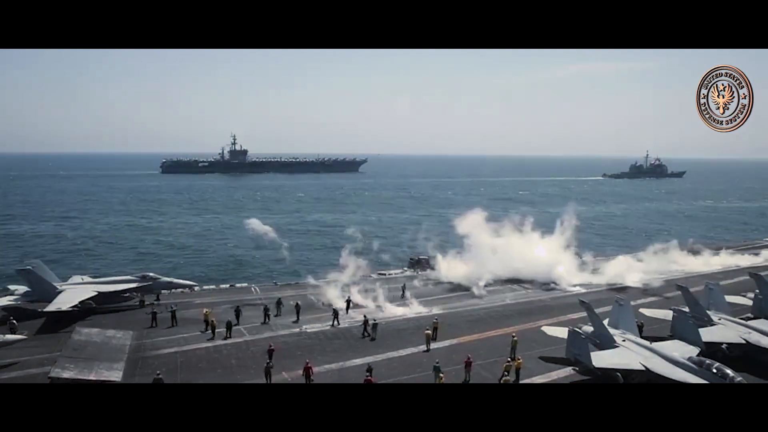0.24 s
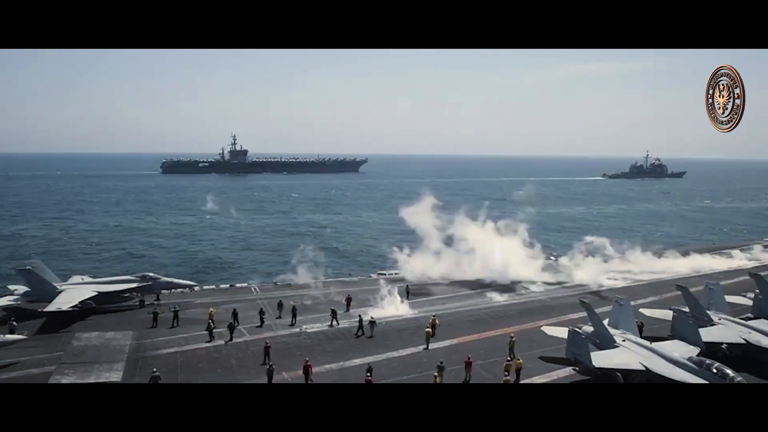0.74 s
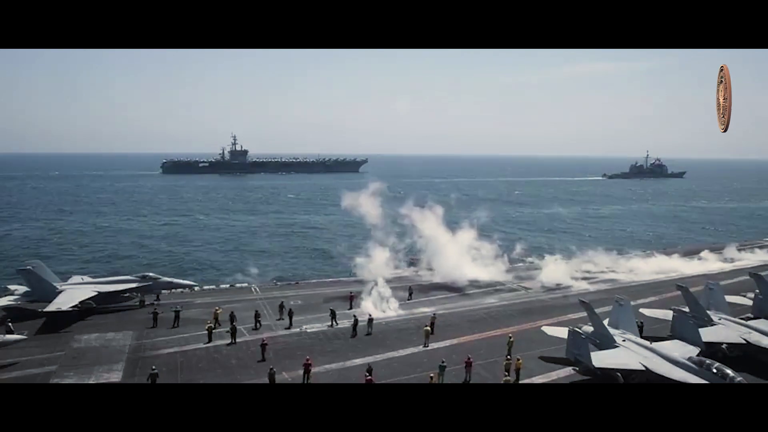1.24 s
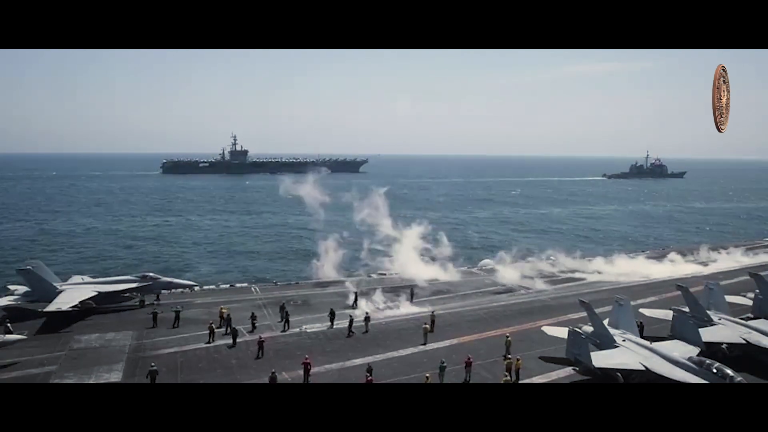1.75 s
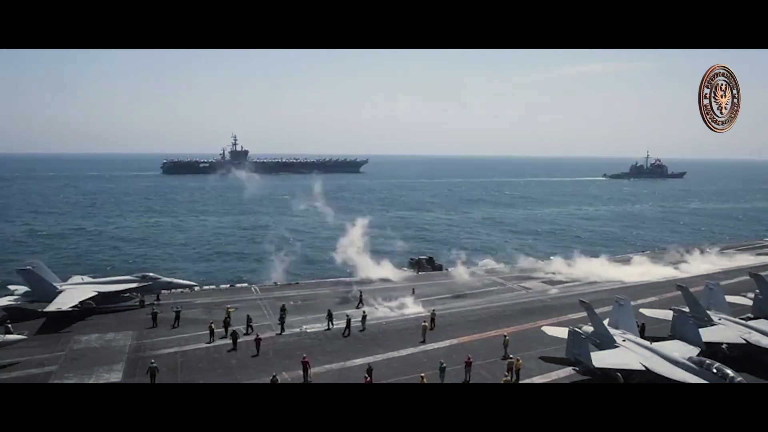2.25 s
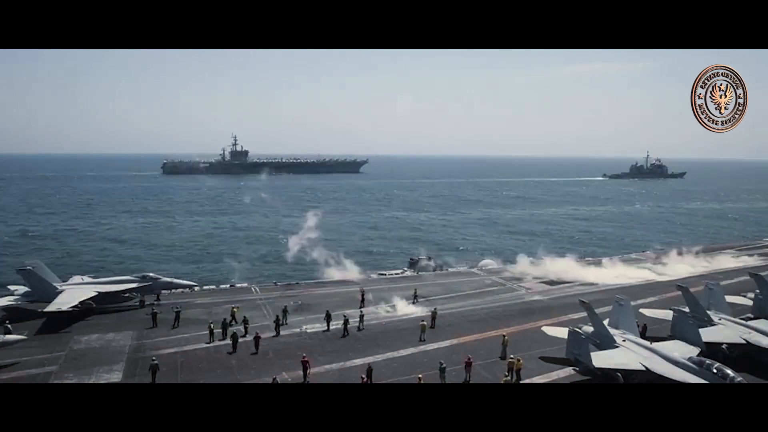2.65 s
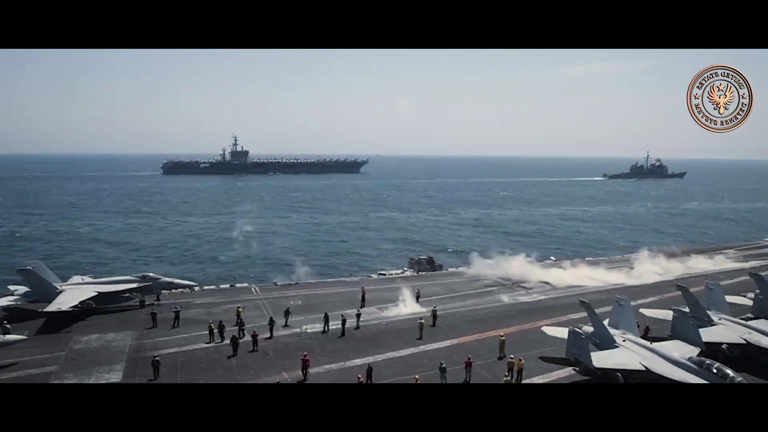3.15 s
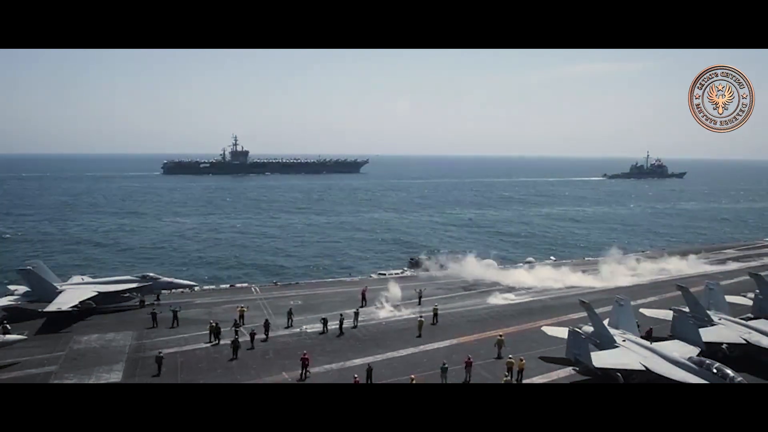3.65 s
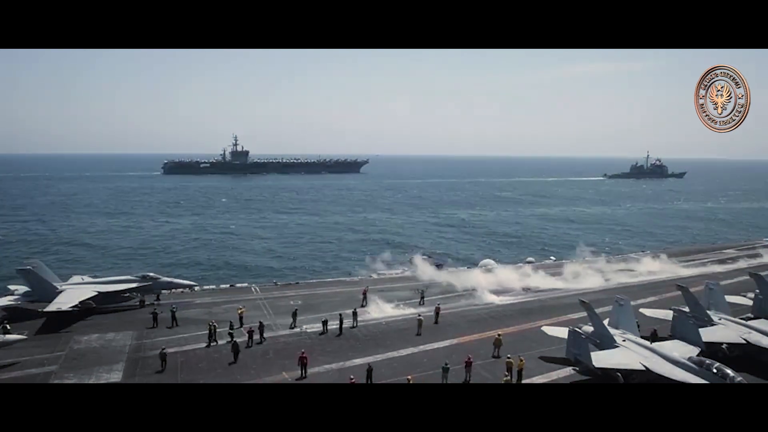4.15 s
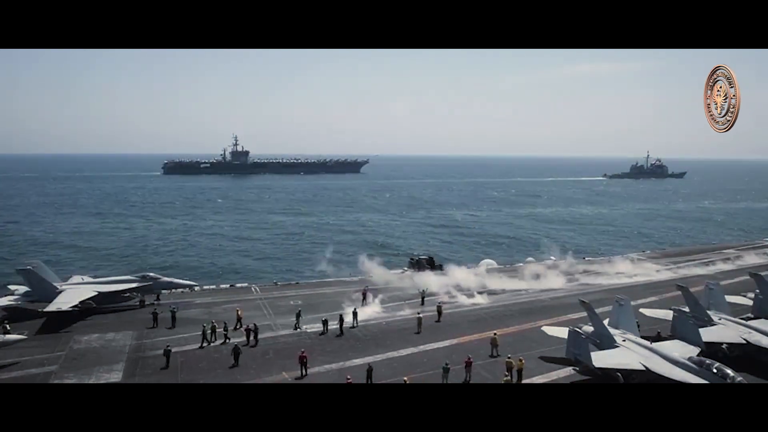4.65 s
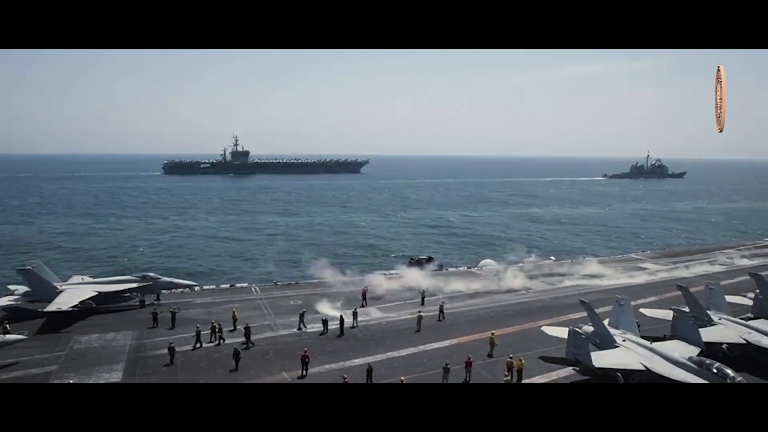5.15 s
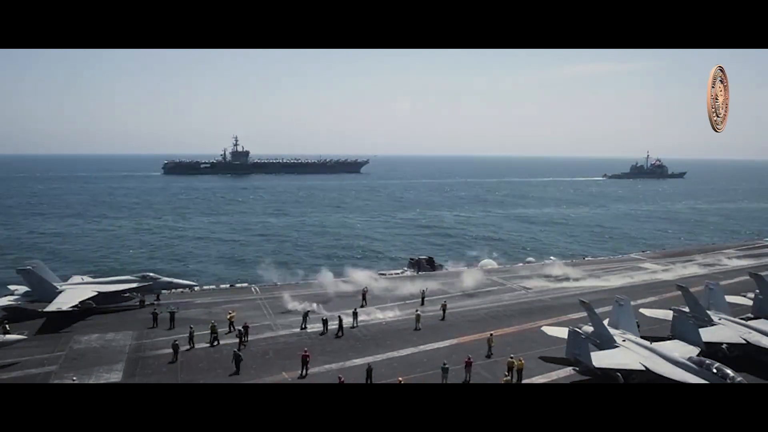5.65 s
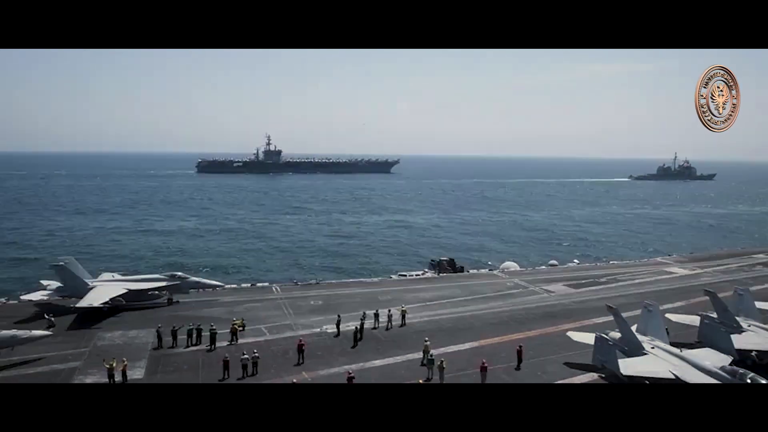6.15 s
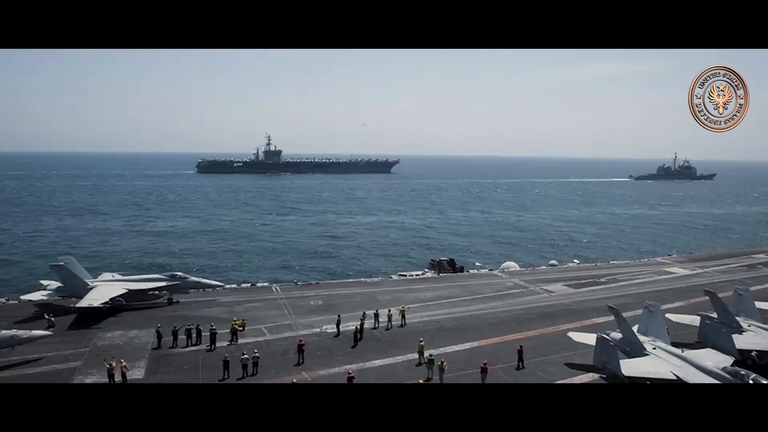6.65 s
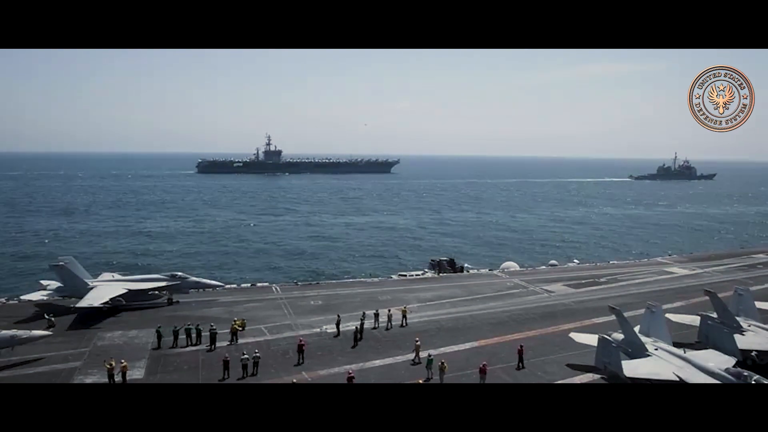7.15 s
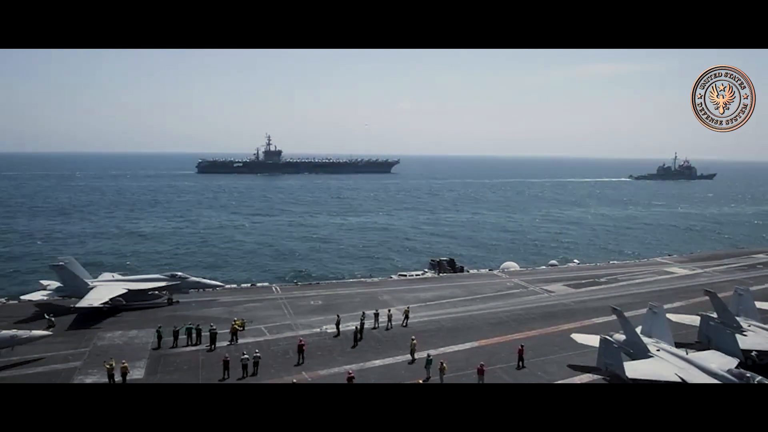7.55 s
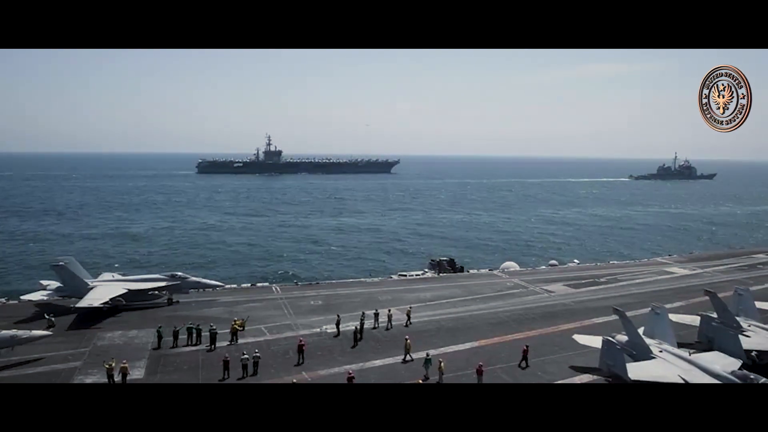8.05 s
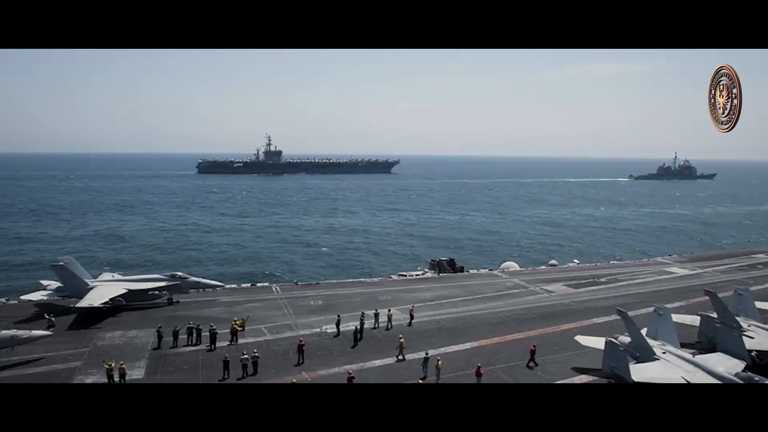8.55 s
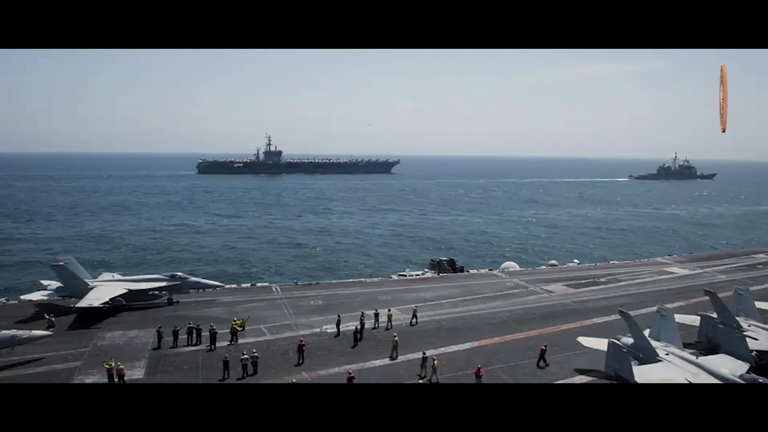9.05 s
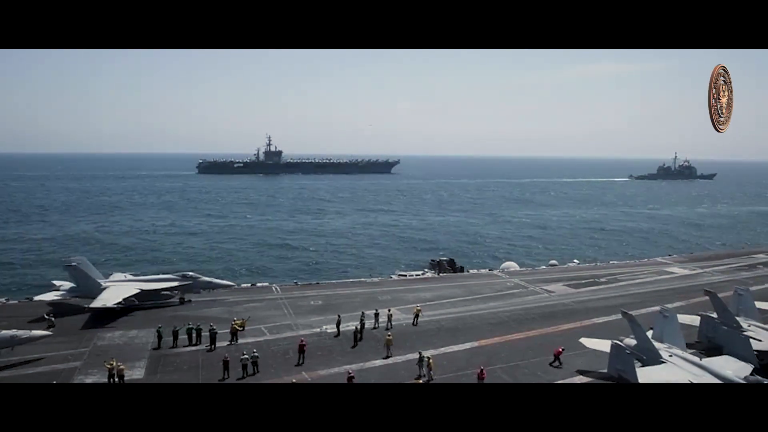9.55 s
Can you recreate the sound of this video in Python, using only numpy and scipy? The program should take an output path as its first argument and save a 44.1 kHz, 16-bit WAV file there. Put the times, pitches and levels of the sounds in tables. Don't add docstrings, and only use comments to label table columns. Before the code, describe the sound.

Windy carrier deck: subdued jet rumble and wavering whine for six seconds, a tiny tick, then a much louder steady jet roar with one brief dropout.

```python
import sys
import numpy as np
from scipy import signal
from scipy.io import wavfile
from scipy.ndimage import uniform_filter1d

SR = 44100
rng = np.random.default_rng(int(sys.argv[2]) if len(sys.argv) > 2 else 0)


def natural_amplitude(level_db):
    exponent = np.asarray(level_db, float) / 20
    return 10 ** exponent


def pcm_store(signal):
    levels = np.round(np.clip(np.atleast_2d(signal), -1, 1) * 32767)
    wavfile.write(sys.argv[1], SR, levels.astype(np.int16).T)


N = 433062
T = np.arange(N) / SR
IDLE_END = 273600
HOP, SIZE = 256, 1024
COARSE = 16


def evened(x):
    return x / np.sqrt(np.mean(abs(x) ** 2) + 1e-20)


def columns(rows, at, warp=lambda v: v):
    first, *rest = np.transpose(rows)
    return [np.interp(warp(at), warp(first), column) for column in rest]


def log_hz(hz):
    return np.log(hz + 1.)


def chance(*shape):
    z = rng.standard_normal(shape + (2,))
    return z[..., 0] + 1j * z[..., 1]


def patchy(frames, bins, size):
    blotches = uniform_filter1d(rng.standard_normal((frames, bins)), size=size[0], axis=0)
    return evened(uniform_filter1d(blotches, size=size[1], axis=1))


def bells(rows, t):
    s, half, db = np.transpose(rows)[..., None]
    return np.exp(-((t - s) / half) ** 2), db


def bumps(rows, t):
    bell, db = bells(rows, t)
    return (db * bell).sum(0)


LAYER_CENTRES = [70, 200, 1000, 3200, 7000]
# f/Hz, half width/Hz, depth/dB, flutter/dB
NARROW_SLOT = (4780, 90, -11, 6)


def turbulence_db(hz, layers, colour, patchy_db, flicker_db, slot):
    frames, count = len(layers[0]), len(LAYER_CENTRES)
    layers = layers - layers.mean(axis=1, keepdims=True)
    centres = log_hz(np.array(LAYER_CENTRES))
    blend = np.array([np.interp(log_hz(hz), centres, row) for row in np.eye(count)])
    field_db = columns(colour, hz, log_hz)[0] + layers.T @ blend
    field_db += patchy_db * patchy(frames, len(hz), size=(8, 6))
    eddies = uniform_filter1d(rng.standard_normal((frames, count)), size=4, axis=0)
    field_db += flicker_db * (evened(eddies) @ blend) * np.minimum(hz / 4000, 1)
    if slot:
        slot_hz, half_hz, depth_db, flutter_db = NARROW_SLOT
        flutter = patchy(frames, count, size=(14, 1))[:, :1]
        slot_shape = np.exp(-((hz - slot_hz) / half_hz) ** 4)
        field_db += np.minimum(depth_db + flutter_db * flutter, 0) * slot_shape
    return field_db


def direct_share(share, scattered_db, scatter_db):
    shape = len(scattered_db), len(share)
    share = np.clip(share, .02, 1 - 1e-4)
    blotch_db = scatter_db * patchy(*shape, size=(10, 3)) - 0.1 * (share * scatter_db) ** 2
    blotch_db += 1.15 * share * scattered_db[:, None]
    blotch_db += -17 * np.maximum(patchy(*shape, size=(10, 14)) - 1, 0)
    stray = (1 - share) / share * natural_amplitude(blotch_db) ** 2
    return 1 / (1 + stray)


def jet(moves, colour, ports, start, length, *, patchy_db, flicker_db, scatter_db, wander, slot,
        echo_s, echo, echo_top_hz):
    frames, hz = length // HOP + 5, np.fft.rfftfreq(SIZE, 1 / SR)
    layers, scattered_db = moves((start + np.arange(frames) * HOP) / SR)
    field_db = turbulence_db(hz, layers, colour, patchy_db, flicker_db, slot)
    share, lead, balance_db = columns(ports, hz, log_hz)
    share = direct_share(share, scattered_db, scatter_db)
    lead = lead * (1 + wander * patchy(frames, len(hz), size=(30, 40)))
    mirror = 1 + echo * np.exp(-(hz / echo_top_hz) ** 2 - 2j * np.pi * hz * echo_s)
    direct = np.sqrt(share) * mirror * chance(frames, len(hz))
    out = np.zeros((2, N))
    for ear, side in enumerate((1, -1)):
        scattered = np.sqrt(1 - share) * chance(frames, len(hz))
        heard = direct * np.exp(.5j * side * lead) + scattered
        heard *= natural_amplitude(field_db + side * balance_db / 2)
        noise = signal.istft(heard.T, nperseg=SIZE, noverlap=SIZE - HOP)[1]
        out[ear, start:start + length] = noise[:length]
    return evened(out) * np.sqrt(length / N)


# t/s, half length/s, level/dB
GUST_SWELLS = [(.25, .08, 0), (.96, 0.12, 6.5), (1.62, 0.064, 2), (1.93, 0.17, 1.5), (2.3, 0.22, 2),
               (2.63, 0.069, 3.5), (3.2, 0.19, 2), (3.5, 0.06, 3), (3.85, .1, 1), (4.5, .07, 1.5),
               (4.86, 0.053, 4.5), (5.3, 0.11, 2.5), (5.7, .2, 3)]
GUST_FOLLOW = [0, 0, 0.16, 0.7, 1]
DEPARTING_JET = [8, 5, 3.5, 1, 1.5]
# t/s, half length/s, level/dB
RUMBLE_BUFFETS = [
    (.62, 0.097, 3),
    (1.0, 0.18, 5),
    (1.52, .13, 10),
    (2.45, .1, -5),
    (4.03, .06, 7),
    (4.7, 0.13, -1),
    (5.28, .08, 0),
    (5.85, 0.4, 6.5),
]
# t/s, half length/s, level/dB
CLEAR_SPELLS = [
    (.95, .12, -3),
    (1.62, .06, -5),
    (2.0, .06, 1),
    (2.6, .07, 1),
    (2.9, 0.074, -2),
    (3.45, .08, 0),
    (4.75, .1, 0),
    (5.27, .09, 0),
    (5.72, 0.11, -5),
]


def idle_moves(t):
    layers = np.outer(GUST_FOLLOW, bumps(GUST_SWELLS, t))
    layers += np.outer(DEPARTING_JET, np.exp(-t / 0.53))
    layers[:2] += np.outer([1, 0.24], bumps(RUMBLE_BUFFETS, t))
    return layers, bumps(CLEAR_SPELLS, t)


# f/Hz, level/dB per Hz
IDLE_TONE = [(25, -30), (45, -14.5), (100, -11), (185, 2), (400, -4), (800, -6.5), (1500, -10.5),
             (2500, -9), (3600, -12), (4650, -14), (6500, -14), (8500, -19.5), (9600, -21.5),
             (12400, -21.5)]
# f/Hz, shared part 0-1, left lead/rad, left-right level/dB
IDLE_PAIR = [(60, 1, 0, 0), (190, 1, 0, 0), (480, 0.86, 0.08, -.3), (820, 0.53, 1.1, -.5),
             (1260, 0.28, -1.7, -0.7), (1684, 0.38, -2, -1.2), (2430, 0.74, -2.9, -0.5),
             (3230, 0.86, -3.1, 0.2), (3900, 0.78, -3.3, -.5), (4520, 0.18, -3.5, -1), (5500, 0, -4.5, -5),
             (6400, 0.44, -4.5, -1.5), (7400, 0.7, -6, -2), (8500, 0.07, -4.5, -0.5)]


def idle_engines():
    return natural_amplitude(-31) * jet(idle_moves, IDLE_TONE, IDLE_PAIR, 0, IDLE_END,
                          patchy_db=1.76, flicker_db=1.86, scatter_db=6.3, wander=0.032, slot=True,
                          echo_s=0.00567, echo=0.04, echo_top_hz=700)


def blur(width_hz):
    r = np.exp(-np.pi * width_hz * COARSE / SR)
    return evened(signal.lfilter([1], np.convolve([1, -r], [1, -r]), chance(IDLE_END // COARSE)))


# order, level/dB, width/Hz, left lead/rad, left-right level/dB
FAN_ORDERS = [(2, 3, 32, -1.5, -3.5), (3, -16, 15, -2.5, -10), (4, -10, 36, -2, -0.5),
              (5, 3.5, 140, -4, -4), (6, -5, 160, -7, -1.5), (7, -7.5, 250, -6.5, -1.5),
              (8, -8.5, 180, -6.4, -1.5), (9, -18, 170, -6.5, -.7), (10, -14, 220, -8, -.3)]
# f/Hz, level/dB, width/Hz, left lead/rad, left-right level/dB
COMPRESSOR_TONE = (11321.5, -0.5, 700, -5.5, -.3)
# t/s, half length/s, level/dB
SECOND_ORDER_BEATS = [
    (.9, .2, 8.5),
    (1.55, 0.13, 7),
    (1.95, 0.16, 11),
    (2.3, 0.13, 10),
    (2.62, 0.076, 6),
    (3.25, .3, 7),
    (4.0, 0.13, 8.5),
    (4.8, 0.11, 3),
    (5.55, 0.18, 6),
    (6.0, 0.12, 8),
]
# t/s, half length/s, level/dB
COMPRESSOR_PASSES = [
    (1.3, 0.066, 7),
    (1.65, 0.13, -5),
    (3.2, .1, 1),
    (3.7, .15, 3),
    (6.12, 0.23, 8),
]


def whine():
    t, blade_hz, shared = T[:IDLE_END], 1006, 0.37
    slow_t = t[::COARSE]
    high_db = -41 + 1.06 * bumps(GUST_SWELLS, slow_t)
    second_db = -51 + bumps(SECOND_ORDER_BEATS, slow_t)
    compressor_db = -45 + bumps(COMPRESSOR_PASSES, slow_t)
    tones = []
    for order, db, *rest in FAN_ORDERS:
        moving_db = second_db if order == 2 else high_db
        tones.append((order * blade_hz, db + moving_db, *rest))
    hz, db, *rest = COMPRESSOR_TONE
    tones.append((hz, db + compressor_db, *rest))
    out = np.zeros((2, N))
    for hz, db, width_hz, lead, balance_db in tones:
        tone = np.exp(2j * np.pi * hz * t)
        common = np.sqrt(shared) * blur(width_hz)
        fade_db = 2.2 * blur(5.2).real
        for ear, side in enumerate((1, -1)):
            smear = common * np.exp(.5j * side * lead) + np.sqrt(1 - shared) * blur(width_hz)
            smear *= natural_amplitude(db + fade_db + side * balance_db / 2)
            out[ear, :IDLE_END] += (tone * np.interp(t, slow_t, smear)).real
    return out


# t/s, half length/s, level/dB
WIND_KNOCKS = [(.36, .03, -61), (1.1, .03, -54), (1.3, .05, -49), (1.482, 0.097, -38), (1.676, 0.081, -50),
               (2.07, .025, -62), (2.697, .025, -68), (4.33, .03, -55), (4.7, 0.072, -42),
               (4.923, .05, -53), (5.25, 0.075, -49), (5.65, .05, -49), (5.85, .05, -55),
               (6.102, 0.036, -60)]
KNOCK_BAND = (35, 230)


def wind():
    t = T[:IDLE_END:COARSE]
    bell, db = bells(WIND_KNOCKS, t)
    bursts = (natural_amplitude(db) * bell).sum(0)
    band = signal.butter(2, KNOCK_BAND, "bandpass", fs=SR, output="sos")
    lumps = evened(signal.sosfilt(band, rng.standard_normal((2, N))))
    return lumps * np.interp(T, t, bursts, right=0)


# t/s, f/Hz, level/dB, half length/s
CHANGE_TICK = (6.171, 7600, -13, .0009)


def tick():
    s, hz, db, half = CHANGE_TICK
    chirp = natural_amplitude(db) * np.exp(-((T - s) / half) ** 2) * np.sin(2 * np.pi * hz * T)
    return chirp * np.array([[1], [-.3]])


# t/s, level/dB, brightness/dB as the plume turns, scattered part/dB
THRUST_MOVES = [(6.19, -2, -2.5, -4), (6.4, -1.5, -3, 5), (6.62, -2, 1.5, 4), (6.9, -1.5, 0, 2.5),
                (7.15, -1.5, -1, -0.5), (7.45, -1.5, -0.5, -2.5), (7.75, -2, -2.5, 1),
                (8.0, -2, -1.5, -1.5), (8.3, -1, -0.5, -2), (8.55, -1.5, -0.5, 4), (8.8, -1.2, -1.6, 4),
                (9.05, -1.1, -2, -1.5), (9.27, -1.5, 1, -1), (9.5, -1, -0.5, 1), (9.82, -1, -1, -10)]
BRIGHT_FOLLOW = [-0.53, -0.98, -0.99, 0.54, 0.58]


def thrust_moves(t):
    loud_db, bright_db, scattered_db = columns(THRUST_MOVES, t)
    return loud_db + np.outer(BRIGHT_FOLLOW, bright_db), scattered_db


# f/Hz, level/dB per Hz
ROAR_TONE = [(25, -38), (45, -20), (90, -12), (200, -4.5), (330, -5), (550, -2), (1100, -1), (1700, -1),
             (2400, -1.5), (3300, -6.5), (4200, -7.5), (5500, -8.5), (7500, -12.5), (12400, -21)]
# f/Hz, shared part 0-1, left lead/rad, left-right level/dB
ROAR_PAIR = [(60, 0.46, 0.22, -2.5), (500, 0.46, 0.41, -.5), (1000, 0.28, 0.55, -1.5),
             (1405, 0.65, 1.42, -1.5), (1810, 0.12, 3.77, -2.1), (2130, 0.88, 2.97, -.6),
             (2420, 0.97, 3.2, 0.2), (2900, 0.82, 2.97, -1), (3390, 0.1, 3.3, 5), (4250, 0.41, 3, 1),
             (4730, 0.28, 3.3, 1.5), (5550, 0.058, 6.3, 1), (6700, 0.41, 6.4, 1.8),
             (8500, 0.059, 8.05, 2.5)]


def full_thrust():
    start = IDLE_END - 4096
    return natural_amplitude(-12.5) * jet(thrust_moves, ROAR_TONE, ROAR_PAIR, start, N - start,
                            patchy_db=1.6, flicker_db=0.61, scatter_db=8.6, wander=0.0067, slot=False,
                            echo_s=0.005546, echo=0.58, echo_top_hz=1750)


# t/s, idle level/dB, thrust level/dB
SCENE_CHANGE = [
    (0, 0, -90),
    (6.160, -1, -41),
    (6.165, 2, -15),
    (6.172, -9, -6),
    (6.178, -34, 0),
    (6.19, -90, -0.5),
]


def scene():
    idle_db, thrust_db = columns(SCENE_CHANGE, T)
    idling = (idle_engines() + whine() + wind()) * natural_amplitude(idle_db)
    return idling + tick() + full_thrust() * natural_amplitude(thrust_db)


def overload(x):
    ceiling, lopsided = 1.1, -.06
    offset = x ** 2 - uniform_filter1d(x ** 2, size=2000)
    return ceiling * np.tanh((x + lopsided * offset) / ceiling)


# t/s, level/dB
DROPOUT_GAIN = [
    (8.1095, 0.5),
    (8.1115, -26),
    (8.128, -24),
    (8.130, -42),
    (8.1345, -51),
    (8.136, -90),
    (8.146, -79.5),
    (8.149, -55),
    (8.1495, 0),
]


def dropout(x):
    return x * natural_amplitude(columns(DROPOUT_GAIN, T)[0])


def band_limit(x):
    return signal.sosfilt(signal.butter(12, 12405, fs=SR, output="sos"), x)


def record(dry):
    mix = dropout(overload(dry))
    return band_limit(mix)


dry = scene()
out = record(dry)
pcm_store(out)
```